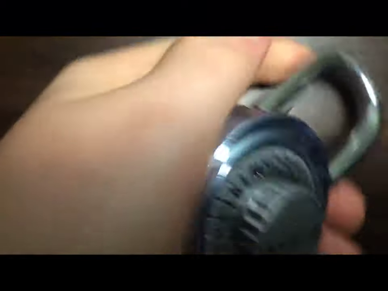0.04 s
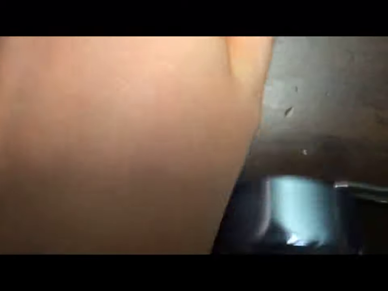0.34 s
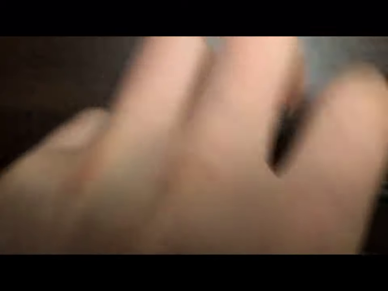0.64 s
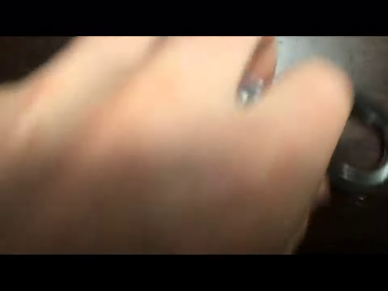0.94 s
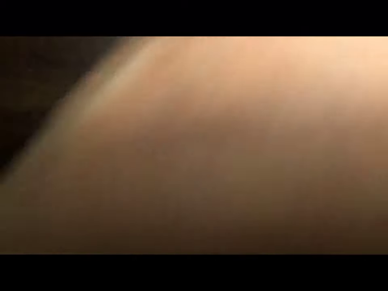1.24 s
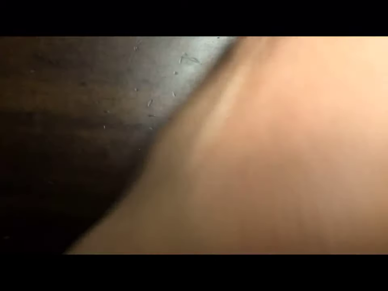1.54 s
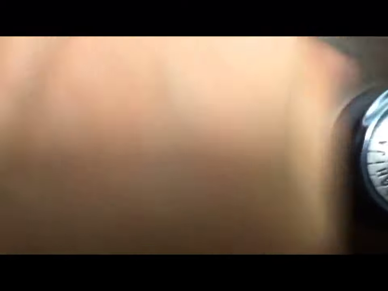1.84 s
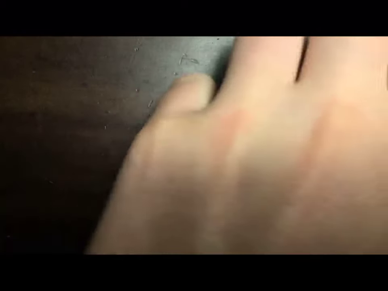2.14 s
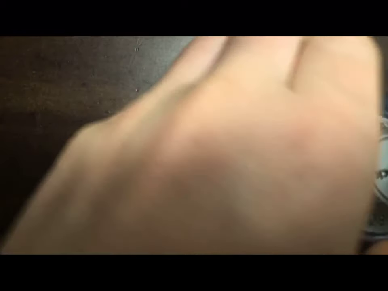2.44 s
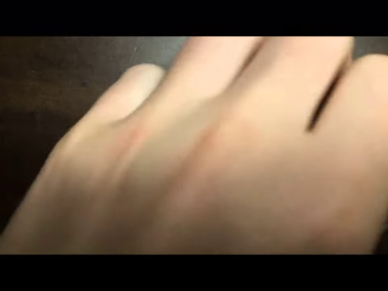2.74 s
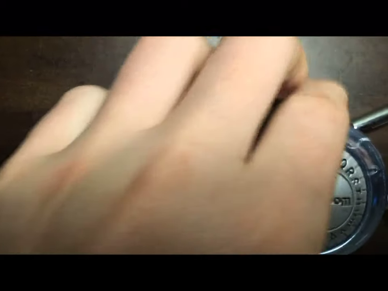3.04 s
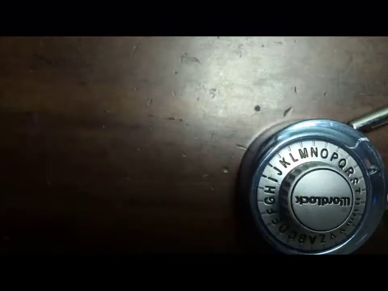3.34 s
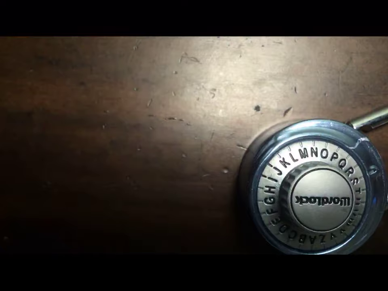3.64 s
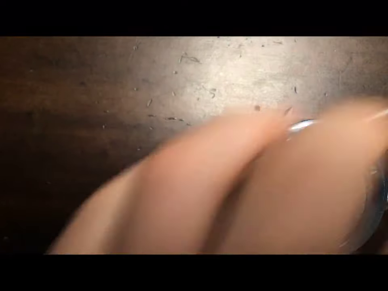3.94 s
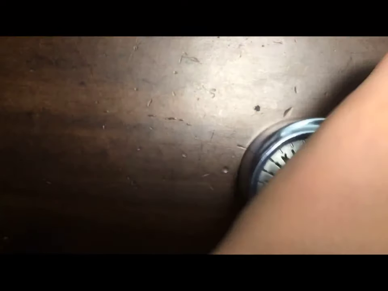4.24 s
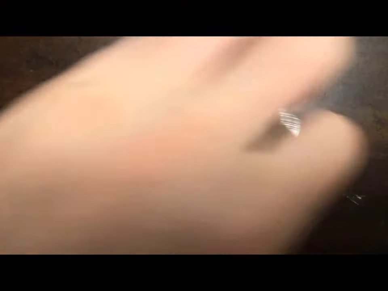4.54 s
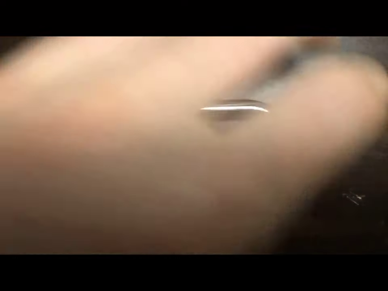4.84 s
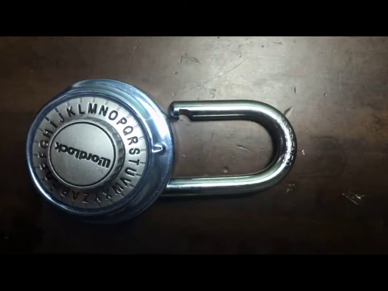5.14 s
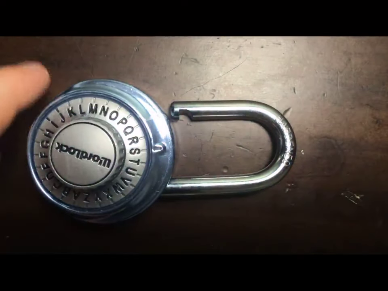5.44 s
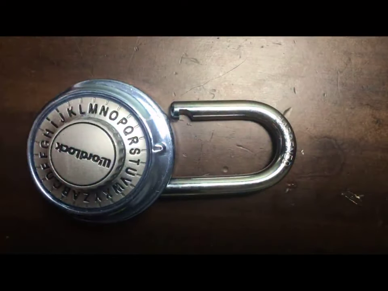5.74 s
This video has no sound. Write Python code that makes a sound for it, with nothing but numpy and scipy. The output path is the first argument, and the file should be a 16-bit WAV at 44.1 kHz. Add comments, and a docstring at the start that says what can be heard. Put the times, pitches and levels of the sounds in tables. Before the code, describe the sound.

Close metallic clicks and clattering knocks of a padlock handled on a wooden tabletop, followed by a short scraping slide.

```python
"""A steel combination padlock, handled close up on a wooden table in a small room.
Latch and shackle click in the hand, rubbed steel grinds and squeaks, the case knocks and rattles on
the wood and is laid down. A hand bumps the table, slides the lock across it and lets it settle.
Blows ring the modes of table, case, shackle and small parts; friction is a stream of tiny slips."""
import sys
import numpy as np
from scipy import signal
from scipy.fft import rfft
from scipy.io import wavfile
from scipy.ndimage import uniform_filter1d, map_coordinates

SR = 44100
rng = np.random.default_rng(int(sys.argv[2]) if len(sys.argv) > 2 else 0)


def dump(signal):
    """Clip the signal to [-1, 1] and save it as 16-bit WAV at the path in sys.argv[1]."""
    limited = np.clip(np.atleast_2d(signal).T, -1, 1)
    pcm = np.round(limited * 32767).astype(np.int16)
    wavfile.write(sys.argv[1], SR, pcm)


N = 264600
TIME_S = np.arange(N) / SR
AGE_S = np.arange(SR // 3) / SR

# metal on metal in the lock: t/s, force/dB, sharpness/dB
CLICKS = [(0.036, -36, 1), (0.042, -39, 15), (0.09, -25, 1.5), (0.145, -45.5, -3.5), (0.218, -52, 8),
          (0.263, -40, -2.5), (0.2863, -21.5, 5), (0.377, -33, 5.5), (0.4206, -19.5, 2), (0.449, -36, 2),
          (0.4889, -14, 10), (0.626, -38, 3), (0.662, -43, 0.5), (0.693, -46, 9), (0.733, -37.5, 3),
          (0.883, -24, 2), (1.031, -33.5, -8.5), (1.6353, -31.5, -3), (1.648, -37.5, 6),
          (1.653, -19.5, -3.5), (1.689, -23.5, -6), (1.707, -29.5, -15), (1.801, -29, -8.5),
          (1.818, -27, -5), (1.825, -30.5, 2.5), (1.852, -26.5, 0.5), (1.9392, -36.5, 15.5),
          (2.033, -17, 1), (2.153, -45, 8), (2.276, -34, 0), (2.296, -35.5, 3.5), (2.625, -25, 3.5),
          (2.636, -33, -3), (2.739, -32, -9.5), (2.837, -30.5, 2.5), (2.894, -34, -21), (2.917, -19, -5.5)]
# lock shifts in the fingers: t/s, length/s, metal level/dB, wood level/dB
RUBS = [(0.06, 0.25, -53, -62), (0.29, 0.083, -53.5, -64.5), (0.417, 0.43, -51, -41),
        (0.861, 0.099, -35.5, -29), (1.022, 0.14, -45.5, -36.5), (1.183, 0.052, -33.5, -30),
        (1.295, 0.043, -53, -26.5), (1.38, 0.035, -40.5, -43.5), (1.592, 0.089, -47, -58.5),
        (1.737, 0.068, -56.5, -62), (1.81, 0.15, -42.5, -60), (1.883, .12, -47, -47),
        (2.118, 0.19, -52.5, -45.5), (2.368, 0.14, -46, -48.5), (2.466, 0.038, -43.5, -42.5),
        (2.532, 0.098, -42, -34.5), (2.64, 0.17, -54, -49.5), (2.764, 0.1, -43.5, -49.5),
        (2.881, 0.061, -33, -69.5), (3.023, 0.11, -56.5, -54), (3.13, 0.098, -45.5, -45.5),
        (3.33, 0.063, -53.5, -55.5)]
# steel sings on one mode: t/s, f/Hz, length/s, level/dB
SQUEAKS = [(0.287, 1800, .06, -46), (0.782, 9050, .03, -36), (0.919, 9700, .012, -39),
           (1.185, 9050, .04, -50), (1.58, 2750, .05, -55), (1.608, 9050, .02, -50),
           (2.13, 9040, .016, -36), (2.552, 9750, .016, -40), (2.57, 9150, .05, -49),
           (2.555, 12800, .07, -50), (2.855, 12800, .018, -41), (4.526, 2850, .012, -39),
           (5.055, 2150, .03, -52)]
# lock hits table: t/s, force/dB, weight on wood/dB, sharpness/dB, change per bounce/dB
KNOCKS = [(0.399, -8, -4.5, -15.5, -46), (0.458, -34, 6.5, 1, -8.5), (0.5324, -13, -9, 5, -33),
          (0.559, -10, -2, 10.5, -12), (0.633, -30.5, 0.5, 4.5, -9.5), (0.7797, -7.5, -3.5, 0.5, -9.5),
          (0.802, -25, 1.5, -3.5, -14.5), (0.851, -24.5, -5.5, -1.5, -22), (0.903, -11.5, -3, -3.5, -4),
          (1.049, -33.5, 8, -5.5, -19), (1.2019, -29.5, 10, 5, -9.5), (1.2694, -23, 2.5, -4, -25),
          (1.299, -25, -1.5, 0, -29), (1.327, -27, -5, -27, -7), (1.351, -22.5, -5, -3.5, -12),
          (1.875, -6, -12, -5.5, -18.5), (1.899, -24.5, 1.5, -5, -19), (1.934, -22.5, 3.5, -8, -10),
          (1.985, -28.5, 1.5, -3.5, -26), (2.0268, -16, -5, 3, -27), (2.0604, -25.5, 11, 5, -16.5),
          (2.066, -11, -3.5, 8, -8), (2.106, -21, 0, -5.5, -6.5), (2.129, -32.5, 6.5, 9.5, -5.5),
          (2.426, -41, 4, -8, -5), (2.5713, -12, -11, -4, -4), (2.799, -24.5, -7, -6.5, -41),
          (2.986, -17, -3, -4.5, -36), (3.234, -39.5, 10.5, 5, -14.5), (3.252, -13, 1, -3.5, -9.5),
          (3.268, -15, -2.5, -17, -5.5), (3.283, -22.5, -2.5, 4.5, -15.5), (3.55, -60, 2, -6.5, -15),
          (4.525, -38.5, 1.5, 4, -28), (4.669, -28, 0.5, -20, -8.5), (4.712, -27, -4, -14, -20),
          (4.771, -30, -4, -8, -3.5), (4.922, -41.5, 8, 8, -9), (5.056, -46, 0, 12.5, -5.5),
          (5.14, -44.5, 3, -1.5, -14), (5.155, -50.5, 10.5, 4.5, -24)]
# hand or lock bumps table: t/s, f/Hz, level/dB
BUMPS = [(2.22, 232, -32.5), (3.158, 125.5, -31), (4.135, 124.5, -22.5), (4.178, 125.6, -31.5),
         (4.466, 121, -34.5), (5.144, 245, -31.5), (5.196, 240, -45)]
# lock slides on table: t/s, drag level/dB, scrape level/dB
SLIDE = [(4.45, -71, -83), (4.472, -51.5, -76.5), (4.516, -47.5, -64), (4.526, -47, -58),
         (4.542, -43, -53.5), (4.64, -53.5, -46.5), (4.668, -31, -32.5), (4.842, -39, -35),
         (4.972, -46.5, -50.5), (5.058, -37, -43.5), (5.11, -73, -95)]

# modes: f/Hz, level/dB, t60/s
TABLE_MODES = [(128, -5, .18), (168, -11, .12), (247, -5, .22), (318, -3, .19), (338, -2, .17),
               (450, -6, .13), (520, -7, .14), (631, -11, .14), (730, -6, .13), (860, -5, .11),
               (910, -8, .1)]
CASE_MODES = [(1170, -13, 0.096), (1210, -11, 0.052), (1373, 3, 0.053), (1520, 4, .045), (1680, 1.5, 0.015),
              (1805, -6, 0.083), (1849, -4, 0.037), (2280, -6, 0.049), (2650, -17, 0.013)]
SHACKLE_MODES = [(3066, -8, 0.053), (3060, -11.5, .025), (3361, -8.5, .025), (3480, -3.5, 0.013),
                 (3800, -3, 0.018), (3926, -2.5, 0.016), (4076, -1, 0.014), (4190, -2.5, 0.018),
                 (5050, -12, 0.038)]
SMALL_PART_MODES = [(5450, 1, 0.061), (5830, 1, .03), (6730, 0.5, 0.027), (7150, -0.5, .03),
                    (8080, -2, .035), (8860, -1, .035), (9370, -10, .03), (11100, -4.5, 0.0067),
                    (12800, -10.5, .04)]
# spectra of dense, fast-damped vibration: f/Hz, level/dB
TABLE_THUD = [(30, -61), (60, -31.5), (110, -7.5), (300, -1), (480, 0), (650, -6), (900, -7), (1200, -16),
              (2500, -55.5)]
CASE_CRACK = [(80, -65.5), (250, -37.5), (700, -9), (1050, 3), (1400, 6), (1820, -2), (2020, -12),
              (2600, -9.5), (4000, -55.5)]
HELD_CASE_CRACK = [(100, -54), (400, -16), (800, -16), (1200, -7), (1850, 4), (2050, -12.5), (2650, -8.5),
                   (3100, -12), (4200, -47)]
SHACKLE_CRACK = [(200, -73), (1200, -34.5), (2600, -12.5), (3050, -8.5), (3550, 3.5), (4200, -9),
                 (4550, -9.5), (6000, -13.5), (10000, -46)]
SMALL_PART_TICK = [(300, -70), (2500, -29), (4500, -6), (5600, 1.5), (7500, 0.5), (9300, -0.5),
                   (10700, -6.5), (11600, -8.5), (16000, -18)]
# friction spectra: f/Hz, level/dB
METAL_GRIND = [(120, -55.5), (400, -22), (750, -8), (1300, 3), (1800, -0.5), (2300, -10), (3300, -13.5),
               (5000, -38)]
METAL_GRIT = [(1500, -27), (2600, -4), (3600, 0.5), (5000, -3.5), (7000, -9.5), (9500, -11.5),
              (12000, -27.5), (16000, -27)]
WOOD_DRAG = [(41, -55.5), (70, -57), (117, 13), (202, -4), (242, 4), (332, 7.5), (370, -4), (464, 2),
             (548, -1.5), (697, -0.5), (764, -11), (1400, -5), (1920, -30), (2270, -10.5), (2600, -17),
             (3380, -36), (5720, -120)]
STEEL_SCRAPE = [(1290, 1.5), (2200, 0.5), (2550, -10.5), (3360, -2), (3680, 0.5), (4200, -1), (4880, -6.5),
                (5350, -2.5), (6860, -6), (7520, -4.5), (9020, -10.5), (11500, -10.5), (13300, -26),
                (15000, -25), (16000, -41)]
SKIN_BRUSH = [(30, -29.5), (100, 11), (400, 7.5), (2000, 2), (7000, -5.5), (10000, -6), (16000, -27.5)]
# resonances driven by scraping: f/Hz, width/Hz, lift/dB
SCRAPE_PEAKS = [(243, 29, 9.5), (487, 70, 8), (1350, 97, 7), (1767, 63, 8.5), (3655, 91, 14.5),
                (4740, 180, 7.5), (6050, 110, 10), (6610, 40, 22.5), (8980, 170, 15)]
# room reverberation: f/Hz, t60/s, level/dB
ROOM_BANDS = [(145, 0.35, -19), (400, 0.073, -13.5), (1400, 0.1, -19), (3797, 0.33, -31.5),
              (10000, 0.18, -25)]
# background hiss spectrum: f/Hz, level/dB
HISS_SPECTRUM = [(15, -29.5), (25, -15), (55, 0.5), (161, -13), (229, -14.5), (263, -15.5), (335, -17.5),
                 (516, -29), (607, -26), (988, -30.5), (1290, -28), (2160, -33), (4030, -35),
                 (11300, -42.5), (16000, -56.5)]

SHACKLE_PER_SHARP, TICK_PER_SHARP = .9, 1.1  # dB per dB of sharpness


def undb(db):
    """Decibels to gain."""
    return 10 ** (np.asarray(db) / 20)


def unit(x):
    """Scale to rms 1."""
    return x / np.sqrt(np.mean(x ** 2))


def fade(t60_s):
    """Free decay."""
    return np.exp(-np.log(1000) * AGE_S / t60_s)


def onset(rise_s):
    """Smooth rise to 1."""
    return 1 - np.exp(-(AGE_S / rise_s) ** 2)


def wander(n, span_samples):
    """Smoothed noise, rms 1."""
    return unit(uniform_filter1d(rng.standard_normal(n), span_samples))


def add(out, t_s, x):
    """Mix x into out at t_s."""
    i = max(int(t_s * SR), 0)
    out[i:i + len(x)] += x[:len(out) - i]


def colour(x, spectrum, peaks=()):
    """Filter by a spectrum plus resonances; rms 1."""
    f_hz = np.maximum(np.fft.rfftfreq(len(x), 1 / SR), 1)
    hz, db = np.transpose(spectrum)
    shape_db = np.interp(np.log(f_hz), np.log(hz), db)
    for centre_hz, width_hz, lift_db in peaks:
        shape_db += lift_db / (1 + (2 * (f_hz - centre_hz) / width_hz) ** 2)
    return unit(np.fft.irfft(rfft(x) * undb(shape_db), len(x)))


def strike(times_s, levels_db, modes, spectrum, crack_db, crack_t60_s, tail_db, tail_t60_s, rise_s,
           rms_samples=128):
    """Blows on one part: modes, crack and chattering tail, scaled by peak short-time rms."""
    bank = np.array([undb(db) * fade(t60_s) * np.exp(2j * np.pi * hz * AGE_S)
                     for hz, db, t60_s in modes])
    bank /= np.linalg.norm(bank[:, 0])
    octaves = np.log2([hz for hz, _, _ in modes])
    noise_envelope = undb(crack_db) * fade(crack_t60_s) + undb(tail_db) * fade(tail_t60_s)
    out = np.zeros(N)
    for t_s, db in zip(times_s, levels_db):
        # gentle blow: longer contact, favours low modes
        tilt_db = .09 * (db - max(levels_db)) * (octaves - octaves.mean())
        contact_point_db = 2.4 * rng.standard_normal(len(modes))
        mix = undb(tilt_db + contact_point_db) * np.exp(2j * np.pi * rng.random(len(modes)))
        crack = colour(rng.standard_normal(len(AGE_S)), spectrum) * noise_envelope
        blow = ((mix @ bank).imag + crack) * onset(rise_s)
        echo_s = .0009 * (.3 + rng.random())  # off the cupped hand
        blow += .35 * np.interp(AGE_S - echo_s, AGE_S, blow, 0)
        peak_rms = np.sqrt(uniform_filter1d(blow ** 2, rms_samples).max())
        add(out, t_s, blow * undb(db) / peak_rms)
    return out


def friction(slips_per_s, spread_db, flutter_db):
    """Tiny uneven slips, surging as the surfaces catch and let go."""
    slips = (rng.random(N) < slips_per_s / SR) * rng.standard_normal(N)
    size_db = spread_db * np.minimum(rng.exponential(size=N), np.pi)
    return slips * undb(size_db + flutter_db * wander(N, 700))


def stroke(start_s, length_s, attack_s, release_t60_s):
    """Hand pressure: builds, holds, dies away."""
    rise = np.clip((TIME_S - start_s) / attack_s, 0, 1)
    release = np.clip((TIME_S - start_s - length_s) / release_t60_s, 0, 2)
    return rise * undb(-60 * release)


def clicks():
    """Latch and shackle snap; the hand damps them and smothers the two lowest case modes."""
    t_s, db, sharp_db = np.transpose(CLICKS)
    case = strike(t_s, db, CASE_MODES[2:], HELD_CASE_CRACK,
                  crack_db=6, crack_t60_s=.016, tail_db=-13, tail_t60_s=.095, rise_s=.0007)
    shackle = strike(t_s, db + SHACKLE_PER_SHARP * sharp_db, SHACKLE_MODES, SHACKLE_CRACK,
                     crack_db=4, crack_t60_s=.019, tail_db=-18, tail_t60_s=.06, rise_s=.0006)
    tick = strike(t_s, db + TICK_PER_SHARP * sharp_db, SMALL_PART_MODES, SMALL_PART_TICK,
                  crack_db=8, crack_t60_s=.016, tail_db=-12.5, tail_t60_s=.043, rise_s=.0007)
    return undb(-.44) * case + undb(-2.4) * shackle + undb(-13) * tick


def rubs():
    """The lock rubs on the wood; dial and shackle grind with a gritty edge."""
    wood_gain, metal_gain = 0, 0
    for t_s, length_s, metal_db, wood_db in RUBS:
        pressure = stroke(t_s, length_s, attack_s=.016, release_t60_s=.22)
        wood_gain += undb(wood_db) * pressure
        metal_gain += undb(metal_db) * pressure
    wood_slips = friction(slips_per_s=5000, spread_db=1.5, flutter_db=2.2)
    fine_slips = friction(slips_per_s=9000, spread_db=1, flutter_db=1.8)
    coarse_slips = friction(slips_per_s=2300, spread_db=0, flutter_db=4)
    rub = colour(wood_slips, TABLE_THUD, [(hz, 25, 6) for hz, _, _ in TABLE_MODES])
    grind = colour(coarse_slips, METAL_GRIND, [(hz, 70, 5) for hz, _, _ in CASE_MODES])
    grit = colour(fine_slips, METAL_GRIT, [(hz, 120, 4) for hz, _, _ in SHACKLE_MODES + SMALL_PART_MODES])
    return wood_gain * undb(-4) * rub + metal_gain * (undb(-3.5) * grind + undb(-14) * grit)


def squeaks(waver_hz=70, ring_t60_s=.2, ring_db=-18):
    """Stick-slip drives one steel mode, which rings on faintly."""
    out = np.zeros(N)
    for t_s, hz, length_s, db in SQUEAKS:
        pitch_hz = hz + waver_hz * wander(len(AGE_S), 40)
        tone = np.sin(2 * np.pi * np.cumsum(pitch_hz) / SR)
        progress = np.minimum(AGE_S / length_s, 1)
        envelope = np.sin(np.pi * progress) + undb(ring_db) * progress * fade(ring_t60_s)
        add(out, t_s, undb(db) * tone * envelope)
    return out


def bounces(contacts=3, gap_s=.009, scatter=.05, dull_db=-1.5):
    """The round case rocks back onto the wood, weaker and duller each time."""
    for t_s, db, weight_db, sharp_db, change_db in KNOCKS:
        for k in range(contacts):
            delay_s = k * gap_s * (1 + scatter * rng.standard_normal())
            yield t_s + delay_s, db + k * change_db, weight_db, sharp_db + k * dull_db


def knocks(radiation_cutoff_hz=90.5):
    """Lock drops on wood: table booms, case rattles; sharp contacts wake shackle and small parts."""
    t_s, db, weight_db, sharp_db = np.transpose(list(bounces()))
    table = strike(t_s, db + weight_db, TABLE_MODES, TABLE_THUD, rms_samples=256,
                   crack_db=6, crack_t60_s=.032, tail_db=-12, tail_t60_s=.18, rise_s=.0012)
    case = strike(t_s, db, CASE_MODES, CASE_CRACK,
                  crack_db=5, crack_t60_s=.02, tail_db=-10.5, tail_t60_s=.15, rise_s=.0008)
    shackle = strike(t_s, db + SHACKLE_PER_SHARP * sharp_db, SHACKLE_MODES, SHACKLE_CRACK,
                     crack_db=-1, crack_t60_s=.022, tail_db=-15, tail_t60_s=.1, rise_s=.0008)
    tick = strike(t_s, db + TICK_PER_SHARP * sharp_db, SMALL_PART_MODES, SMALL_PART_TICK,
                  crack_db=3, crack_t60_s=.013, tail_db=-12, tail_t60_s=.071, rise_s=.0006)
    blows = undb(-1) * table + undb(-.04) * case + undb(-5) * shackle + undb(-17) * tick
    return signal.sosfilt(signal.butter(3, radiation_cutoff_hz, "high", fs=SR, output="sos"), blows)


def bumps(octave_db=-10):
    """Soft contacts push slowly; only low table modes answer."""
    out = np.zeros(N)
    for t_s, hz, db in BUMPS:
        phase = 2 * np.pi * hz * AGE_S
        ring = np.sin(phase) + undb(octave_db) * np.sin(2 * phase)
        thump = ring * fade(t60_s=.083) * onset(rise_s=.011)
        add(out, t_s, undb(db) * thump / thump.max())
    return out


def brush():
    """Skin brushes the lock once."""
    touch = stroke(start_s=4.13, length_s=.085, attack_s=.018, release_t60_s=.03)
    return undb(-53) * touch * colour(rng.standard_normal(N), SKIN_BRUSH)


def slide(squeal_hz=4900, sink=.04):
    """The steel back scrapes the grain, exciting table and lock, and squeals once on the varnish."""
    t_s, drag_db, scrape_db = np.transpose(SLIDE)
    sliding = (TIME_S >= t_s[0]) & (TIME_S <= t_s[-1])
    drag_gain = sliding * undb(np.interp(TIME_S, t_s, drag_db) - 1.5)
    scrape_gain = sliding * undb(np.interp(TIME_S, t_s, scrape_db) + .1)
    squeal_gain = undb(-34.5) * stroke(start_s=4.805, length_s=.015, attack_s=.0083, release_t60_s=.25)
    slips = friction(slips_per_s=5500, spread_db=1.2, flutter_db=2.3)
    drag = colour(slips, WOOD_DRAG, SCRAPE_PEAKS)
    scrape = colour(slips, STEEL_SCRAPE, SCRAPE_PEAKS)
    squeal = colour(slips, METAL_GRIT, [(squeal_hz, 800, 28)])
    # contact patch shifts: steel resonances waver and sink
    drift = np.interp(TIME_S, [t_s[0], t_s[-1]], [sink, -sink], 0, 0)
    clock = np.cumsum(1 + drift + .016 * wander(N, 1300))
    scrape, squeal = (map_coordinates(x, [clock], order=3, mode="reflect") for x in (scrape, squeal))
    return drag_gain * drag + scrape_gain * scrape + squeal_gain * squeal


def room(x, build_s=.018):
    """Diffuse reflections build up, then decay band by band."""
    log_f = np.log(np.maximum(np.fft.rfftfreq(len(AGE_S), 1 / SR), 1))
    log_centres = np.log([hz for hz, _, _ in ROOM_BANDS])
    response = 0
    for share, (_, t60_s, db) in zip(np.eye(len(ROOM_BANDS)), ROOM_BANDS):
        band_gain = np.sqrt(np.interp(log_f, log_centres, share))
        band = np.fft.irfft(rfft(rng.standard_normal(len(AGE_S))) * band_gain, len(AGE_S))
        envelope = fade(t60_s) * onset(build_s)
        response += undb(db) * band * envelope / np.linalg.norm(envelope)
    return signal.fftconvolve(x, response)[:N]


def scene():
    """Lock, table and room over faint steady hiss."""
    direct = knocks() + clicks() + squeaks() + bumps() + rubs() + brush() + slide()
    hiss = undb(-61) * colour(rng.standard_normal(N), HISS_SPECTRUM)
    return (direct + room(direct) + hiss)[None]


def record(dry, low_hz=48, top_hz=15850):
    """Microphone: bass cut, overload at full scale, top cut."""
    thin = signal.sosfilt(signal.butter(3, low_hz, "high", fs=SR, output="sos"), dry)
    clipped = np.clip(thin, -1, 1)
    return signal.sosfilt(signal.ellip(10, .2, 90, top_hz, fs=SR, output="sos"), clipped)


dry = scene()
out = record(dry)
dump(out)
```